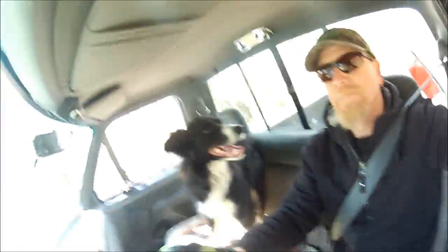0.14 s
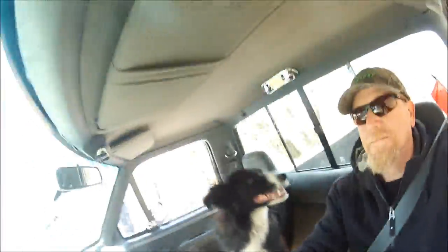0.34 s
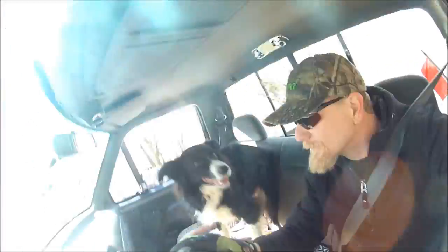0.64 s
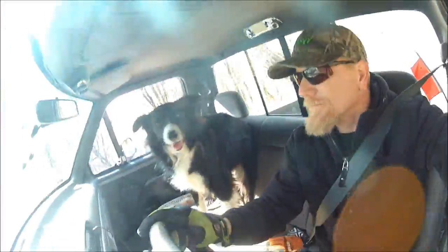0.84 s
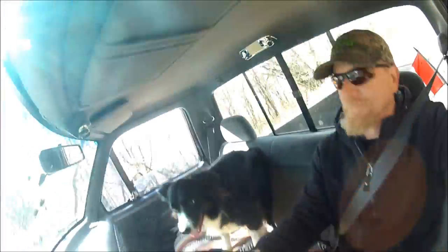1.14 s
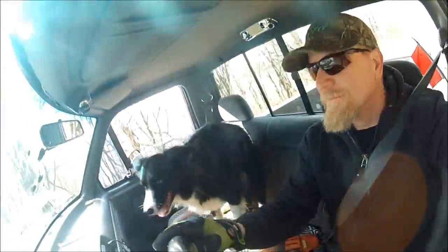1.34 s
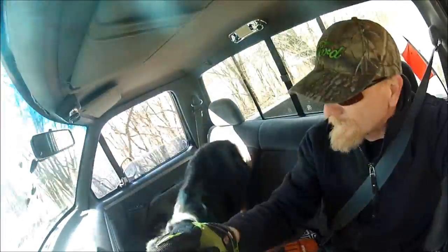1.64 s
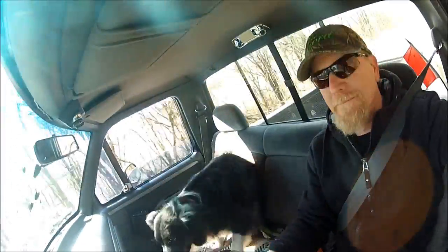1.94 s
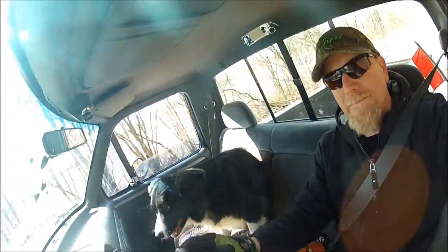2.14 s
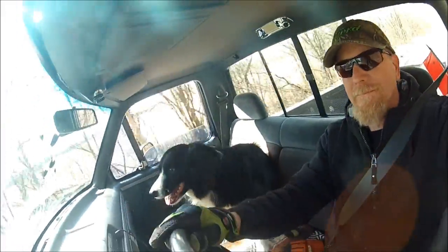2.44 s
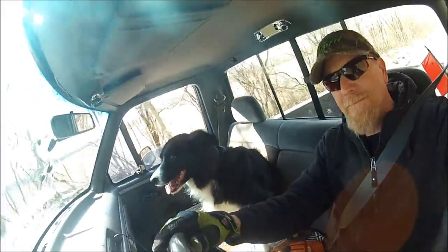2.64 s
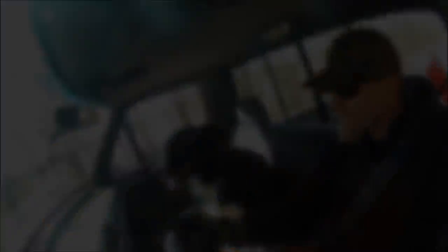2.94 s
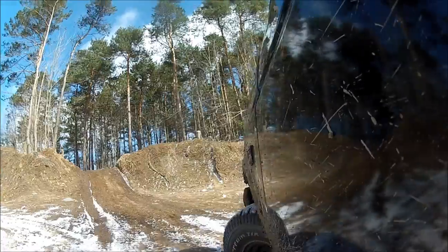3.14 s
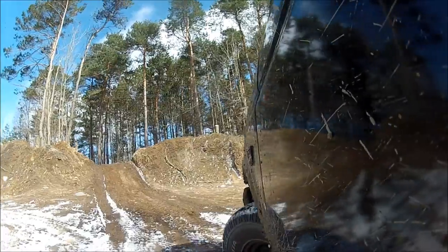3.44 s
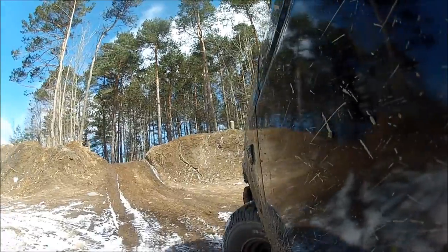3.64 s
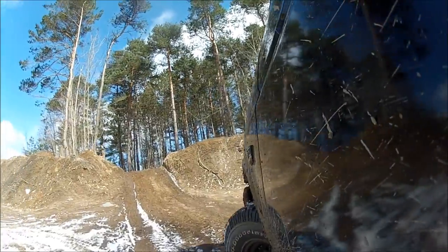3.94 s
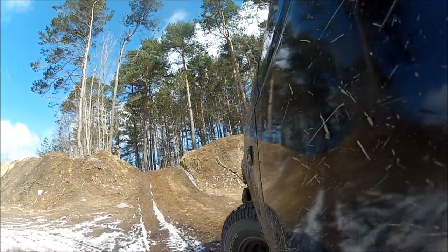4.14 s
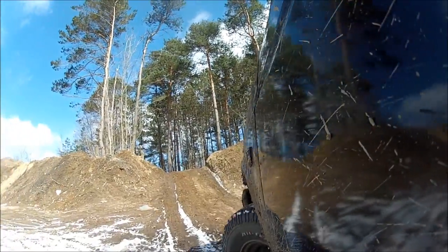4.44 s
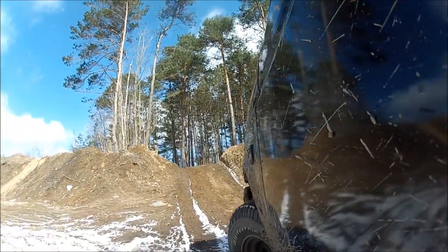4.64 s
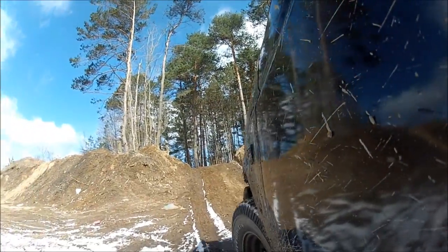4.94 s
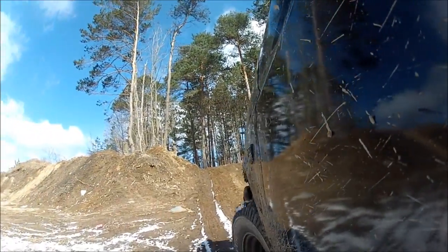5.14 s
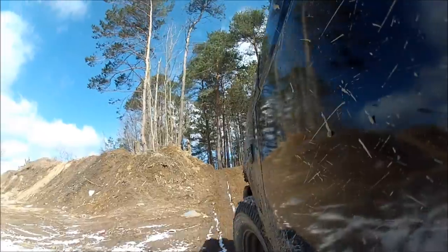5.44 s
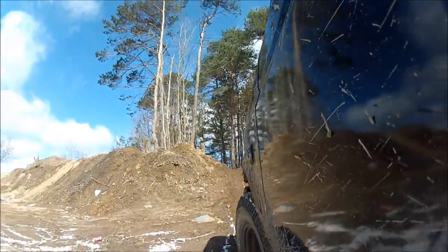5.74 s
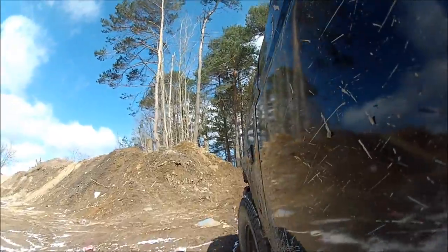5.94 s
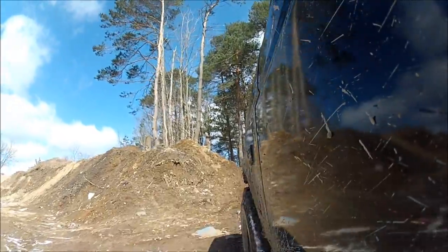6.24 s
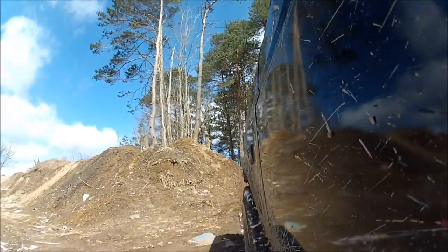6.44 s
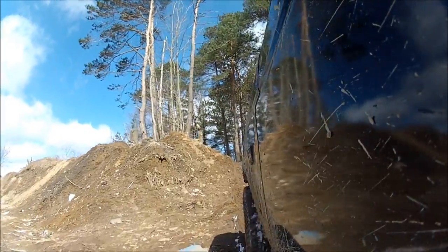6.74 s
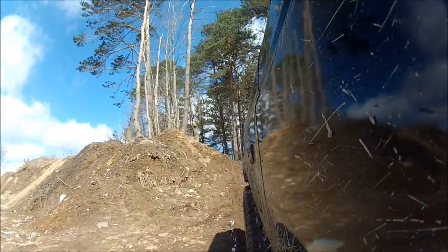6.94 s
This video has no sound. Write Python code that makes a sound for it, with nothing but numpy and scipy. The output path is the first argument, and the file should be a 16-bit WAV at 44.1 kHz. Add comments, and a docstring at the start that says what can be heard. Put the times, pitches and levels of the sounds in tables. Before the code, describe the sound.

Fingers rub, tick and knock a hard plastic camera case right on the microphone, the hardest blows distorting, while a V8 booms low and faint inside a truck cab. Around three seconds it shifts outside by the front wheel: last knocks, then steady exhaust burble, airy fan rush, belt whine, wind and gritty tyres, with small stone pops, brief metal scrapes and two engine revs.

```python
"""A hand rubs, ticks and knocks the plastic case of a small camera, close on the microphone: fingers stick
and slip, hard contacts ring the case, and the loudest knocks overload the microphone.
Behind it a V8 truck crawls along a dirt trail: in the cab, firing pulses boom and ruts rumble.
From 3 s the case rides outside by the front wheel: pulsed exhaust burble, fan rush, belt whine,
and noise for tyre grit and wind, with stones popping under the tread and short metal scrapes."""
import sys
import numpy as np
from scipy import signal
from scipy.fft import rfft, irfft, next_fast_len
from scipy.io import wavfile
from scipy.ndimage import map_coordinates

SR = 44100
rng = np.random.default_rng(int(sys.argv[2]) if len(sys.argv) > 2 else 0)


def wav_record(signal):
    """Record a signal, one row per channel, as 16-bit PCM in the file named by sys.argv[1]."""
    frames = np.transpose(np.atleast_2d(signal))
    bounded = np.clip(frames, -1, 1)
    # unit amplitude maps onto the largest positive 16-bit level
    quanta = np.round(bounded * 32767).astype(np.int16)
    wavfile.write(sys.argv[1], SR, quanta)


N = 313551
TIME = np.arange(N) / SR

# Levels of single contacts are dB against 10 ms at rms 1; widths are nominal, see resonate().
# Engine heard in the cab. Each row: time in seconds, mean firing rate in Hz, boom level in dB.
CAB_ENGINE = [(0, 61.74, -37), (.5, 62.4, -35.5), (.75, 66.05, -42.5), (1.1, 61.9, -42), (1.4, 49.6, -40),
              (1.8, 47.88, -45), (2.35, 47.5, -42.5), (2.52, 47.7, -50), (3.1, 47.2, -50)]
# Boom of the cab, as a spectrum. Each row: frequency in Hz, relative level in dB.
CAB_BOOM = [(15, -22.5), (28, 1.5), (45, 5.5), (65, -1.5), (95, -1.5), (120, 0), (150, -15.5), (260, -18),
            (500, -29.5), (1200, -74)]
# Air noise in the cab, as a spectrum. Each row: frequency in Hz, relative level in dB.
CAB_AIR = [(120, -49.5), (200, -10.5), (462, -15.5), (525, -10), (755, -2.5), (1840, -13.5), (1980, -10),
           (2510, -34.5), (4100, -29), (6130, -53.5), (10000, -30), (13900, -18.5), (15500, -52.5)]
# Engine heard outside; the driver lifts off at 4.5 s, then revs twice.
# Each row: time in seconds, mean firing rate in Hz, load level in dB.
DRIVE = [(3.25, 59.9, -43), (3.6, 60.14, -44), (3.9, 70.1, -41.5), (4.07, 70.86, -43), (4.2, 60.87, -45),
         (4.43, 60.3, -46), (4.58, 60.54, -53.5), (4.8, 64.9, -45), (5.0, 96.25, -45), (5.17, 113.2, -44.5),
         (5.35, 104.9, -46), (5.55, 81.83, -46), (5.88, 71.6, -46), (6.15, 66, -50), (6.5, 55.98, -47.5),
         (6.85, 73.77, -44.5), (7.0, 95.3, -45), (7.11, 97.2, -44.5)]
# Exhaust burble, as a spectrum. Each row: frequency in Hz, relative level in dB.
EXHAUST = [(25, -51), (48, -25), (65, -1), (105, -1.5), (121, 0), (145, -5.5), (175, -26), (202, -25),
           (223, -1.5), (248, -18.5), (280, -22), (325, -20), (400, -46), (900, -47.5)]
# Booms of the truck body and tyres. Each row: frequency in Hz, width in Hz, relative level in dB.
BODY_BOOMS = [(117.4, 9.7, -2.5), (221.4, 9.2, 0.5)]
# Wind, as a spectrum. Each row: frequency in Hz, relative level in dB.
WIND = [(15, -42), (30, 5), (70, 10), (130, 9), (190, -14), (400, -26), (1200, -69)]
# Resonances that colour the fan rush. Each row: frequency in Hz, width in Hz, relative level in dB.
FAN_RESONANCES = [(670, 170, -4), (1250, 260, -3), (1810, 220, 0), (2220, 440, 0), (3080, 380, -8),
                  (5530, 250, -20), (6450, 250, -22), (9000, 400, -18), (9950, 600, -13), (14100, 800, -19),
                  (15100, 280, -24)]
# Tyre grit, as a spectrum. Each row: frequency in Hz, relative level in dB.
TYRES = [(160, -5), (280, -5), (648, 4.5), (863, -1.5), (1230, 5.5), (1580, -4), (1780, 5), (2320, -22),
         (2660, -58), (3090, -6.5), (4330, -19), (9850, -23.5), (15500, -11.5)]
# Stones under the tyre. Each row: start in seconds, level in dB, pitch in Hz.
STONES = [(3.875, -46, 1300), (4.26, -48, 896), (4.39, -56, 3160), (4.579, -48.5, 982), (4.714, -45.5, 642)]
# Short scrapes at the wheel. Each row: start in seconds, length before release in seconds, peak in dB.
SCRAPES = [(4.713, 0.016, -39), (4.759, 0.019, -32), (4.785, 0.04, -35.5), (4.941, 0.029, -41)]
# Resonances of the scraping metal. Each row: frequency in Hz, width in Hz, relative level in dB.
METAL = [(1761, 69, 11.5), (2342, 150, 4.5), (2470, 80, -5.5), (2890, 220, -4), (3270, 260, -2.5),
         (3800, 640, -17.5), (5000, 750, -21.5), (9300, 1100, -10), (14400, 630, -14)]
# Finger strokes over the case. Each row: start in seconds, length in seconds, level in dB.
STROKES = [(0.054, 0.23, -39.5), (0.263, 0.25, -35), (0.457, 0.096, -20), (0.579, 0.28, -39),
           (0.916, 0.09, -33.5), (0.984, 0.33, -42), (1.152, 0.077, -35), (1.222, 0.17, -42),
           (1.402, 0.2, -38), (1.686, 0.093, -39.5), (1.798, 0.07, -49.5), (2.013, .08, -48.5),
           (2.169, 0.075, -36.5), (2.321, 0.089, -45), (2.404, 0.2, -46), (2.61, .17, -46.5),
           (2.77, 0.087, -49.5), (2.961, 0.32, -37.5)]
# Resonances of the case. Each row: frequency in Hz, width in Hz, relative level in dB.
CASE = [(730, 120, -16), (1230, 240, -10), (1480, 140, -8), (1900, 200, 0), (2200, 140, -9),
        (3550, 380, -17), (8450, 480, -24), (10100, 380, -15), (10600, 300, -27), (13950, 450, -18)]
# The note that rubbing draws from the case. Each row: frequency in Hz, width in Hz, relative level in dB.
CASE_NOTE = [(648.7, 22, 0)]
# A light touch on the case, as a spectrum. Each row: frequency in Hz, relative level in dB.
LIGHT_TOUCH = [(400, -21.5), (650, -2.5), (1050, -3.5), (1500, -5.5), (2200, -6), (2800, -23),
               (3600, -13.5), (4500, -23.5), (6000, -35.5), (8200, -22), (9200, -27), (10600, -18),
               (12000, -32), (14000, -27)]
# The crack of a sharp contact, as a spectrum. Each row: frequency in Hz, relative level in dB.
CRACK = [(1200, -14.5), (2600, -3), (3600, 8), (4800, -2.5), (6000, -23), (8400, 1.5), (9400, -31),
         (10300, -6), (12000, -3.5), (13800, -4.5), (15500, -32)]
# Loudest snaps of the plastic. Each row: time in seconds, tick level in dB, sharp edge in dB before its lift.
TICKS = [(0.0094, -26.5, -54), (0.0577, -32, -75), (0.1284, -27, -54), (0.3293, -25.5, -54.5),
         (0.3455, -30, -64.5), (0.3705, -21.5, -66.5), (0.42, -24, -38), (0.494, -15.5, -57),
         (0.5035, -11.5, -55), (0.9227, -23, -32), (0.9528, -24.5, -34), (1.2799, -30.5, -37),
         (1.3213, -23.5, -40), (1.5667, -35, -35.5), (1.8907, -41, -62), (2.0106, -41, -34),
         (2.212, -45, -35.5), (2.262, -46.5, -46), (2.67, -49, -39), (2.9954, -32, -70),
         (3.0425, -25, -40.5), (5.1449, -38.5, -49)]
# Blows on the case. Each row: start in seconds, strength in dB, clack pitch in Hz, thud in the mount in dB
# over the strength, squareness in dB (about 0 is flat on, -25 and below is glancing).
KNOCKS = [(0.145, -9, 943, -3, -16), (0.2059, -21.5, 1710, -4, -23), (0.313, -4.5, 1173, -4, -24.5),
          (0.5326, -11.5, 1700, 0, -29), (0.6675, -14, 1700, -7.5, -14.5), (0.721, -13, 944, -1, -50),
          (0.762, -14.5, 1463, -9.5, -22), (1.0695, -11.5, 1005, -1, -14), (1.2988, -11.5, 1612, 1.5, -2.5),
          (1.3886, -21.5, 1390, -6, -1.5), (1.408, -17.5, 1600, -22, -33), (1.4525, -21, 1494, -2, -2.5),
          (1.71, -19, 696, -6.5, -2.5), (1.8085, -16, 944, -11.5, -2), (2.025, -13.5, 873, -17, 1),
          (2.151, -16, 862, -13.5, 2), (2.3105, -11, 960, -24, -3), (2.4247, -21.5, 860, -12, -4),
          (3.1394, -17.5, 1697, -1, -21), (3.1628, -23.5, 1920, -16, -17)]
# What rings on after a blow. Each row: nominal frequency in Hz, mean relative level in dB, t60 in seconds.
RING = [(635, -1, .18), (690, 2, .06), (11360, -28, .22), (12630, -26, .22)]
# Soft bumps of the hand. Each row: start in seconds, level in dB.
BUMPS = [(0.422, -20.5), (1.083, -23), (1.428, -19), (1.773, -24), (2.39, -29), (3.211, -26.5)]
# Uneven treble of the microphone's port. Each row: frequency in Hz, gain in dB.
PORT = [(11000, 0), (11600, -9), (12400, -9), (13000, -1), (15100, -1), (15600, -18)]
# The outside fades in from the first to the second time, in seconds.
OUTSIDE_FADE_S = (2.95, 2.987)

IDLE_HZ = 60  # firing rate
RUSH_DB, RUSH_DB_PER_OCTAVE = -8, 8  # gain of the rush over the load at idle, and its growth with speed
STROKE_RISE, STROKE_FALL = 0.24, 0.34  # shares of a stroke spent pressing on and letting go
REST_DB, REST_DB_PER_S = -44, -7  # the resting grip creaks ever less
LET_GO_S = 3.26  # the resting hand leaves the case
SNAPS_PER_S, SNAP_DB = 30, -9  # stray snaps of the plastic, gain over the rubbing
RING_DB, RING_GROWS, RING_SQUARE = -16, .4, .15  # at 0 dB; dB per dB of strength and of squareness
GLANCING_DB, GLANCING_SHARPENS = -25, .03  # a blow this glancing raises the ring by this share
TOP_HZ = 15600  # band limit, 6 dB down


def amp(db):
    """Decibels to gain."""
    return 10 ** (np.asarray(db) / 20)


def unit(x):
    """Scale to rms 1."""
    return x / np.sqrt(np.mean(x ** 2) + 1e-20)


def blow(x):
    """Scale a short sound to the energy of 10 ms at rms 1."""
    return x / np.sqrt(np.sum(x ** 2) / (SR / 100) + 1e-20)


def noise():
    """White noise for the whole scene."""
    return rng.standard_normal(N)


def curves(rows):
    """One value per sample for each column after the time."""
    s, *cols = np.transpose(rows)
    return [np.interp(TIME, s, c) for c in cols]


def wobble(rate):
    """A smooth random curve, rate knots a second."""
    knots = rng.standard_normal(2048)
    coarse = TIME[::32]
    return np.interp(TIME, coarse, map_coordinates(knots, [coarse * rate], mode="wrap"))


def filtered(x, response):
    """x times a complex response of frequency."""
    m = next_fast_len(len(x) + 4096)
    return irfft(rfft(x, m) * response(np.fft.rfftfreq(m, 1 / SR)), m)[:len(x)]


def coloured(x, points):
    """x through a spectrum of (Hz, dB) points, flat beyond the ends."""
    f, db = np.transpose(points)
    return filtered(x, lambda hz: amp(np.interp(np.log(hz + 1), np.log(f), db)))


def resonate(x, modes):
    """x through a body's resonances, each 6 dB down across 1.26 widths; steep skirts keep the valleys dark."""
    def body(f):
        total = 0
        for k, (centre, width, db) in enumerate(modes):
            damping = 1j * f * 1.26 * width
            peak = damping / (centre ** 2 - f ** 2 + damping)
            total = total + amp(db) * peak ** 2 * (-1) ** k  # neighbours have opposite signs
        return total
    return filtered(x, body)


def standing_waves(x, share, t60):
    """Dense narrow resonances inside the case comb the treble, by a noise tail cut at 50 ms."""
    t = np.arange(SR // 20) / SR
    tail = coloured(rng.standard_normal(len(t)) * amp(-60 * t / t60), [(1500, -17), (5000, -4)])
    return x + share * signal.fftconvolve(x, tail / np.linalg.norm(tail))[:N]


def add(track, s, sound):
    """Mix a sound in at time s."""
    part = track[max(round(s * SR), 0):][:len(sound)]
    part += sound[:len(part)]


def grains(rate, spread_db):
    """Random impulses of uneven size, rate a second, rms 1."""
    hit = rng.random(N) < rate / SR
    return unit(hit * noise() * amp(spread_db * noise()))


def burst(t, rise):
    """A noisy contact that swells for `rise` seconds and dies."""
    return rng.standard_normal(len(t)) * t / rise * np.exp(-t / rise)


def snap(t, rise):
    """A sharp contact followed by a short gritty slide of equal energy."""
    slide = burst(t, rise)
    return (t == 0) + slide / np.linalg.norm(slide)


def mode(t, hz, t60, attack):
    """One damped vibration."""
    return np.sin(2 * np.pi * hz * t) * amp(-60 * t / t60) * (1 - np.exp(-t / attack))


def clack(t, hz, rise):
    """A few cycles that swell for `rise` seconds and die."""
    return blow(np.sin(2 * np.pi * hz * t) * (t / rise) ** 2 * np.exp(-2 * t / rise))


def firings(speed, uneven, rough):
    """One pulse per firing, and the firing phase; the two banks make the eight pulses unequal."""
    phase = np.cumsum(speed * (1 + .007 * wobble(12))) / SR
    at = np.flatnonzero(np.diff(np.floor(phase)))
    bank = np.array([1, -1, 1, 1, -1, 1, -1, -1])
    pulses = np.zeros(N)
    pulses[at] = 1 + uneven * bank[np.arange(len(at)) % len(bank)] + rough * noise()[:len(at)]
    return pulses - speed / SR, phase  # the mean is taken out


def cab():
    """The engine's firing pulses boom in the cab while the body rumbles over ruts, with faint air noise."""
    speed, boom_db = curves(CAB_ENGINE)
    pulses, _ = firings(speed, uneven=0.69, rough=.15)
    engine = unit(coloured(pulses, CAB_BOOM))
    ruts = unit(coloured(noise(), CAB_BOOM))
    air = amp(-63.0) * unit(coloured(noise(), CAB_AIR))
    return amp(boom_db) * (engine + ruts / 2 ** .5) + air


def engine_exhaust(pulses, phase):
    """Gas noise rides on the firing pulses; the body hums when a firing harmonic crosses one of its booms."""
    drive = unit(pulses) + .7 * noise()
    burble = amp(0.5) * unit(coloured(drive, EXHAUST))
    boom = amp(-15.5) * unit(resonate(drive, BODY_BOOMS))
    harmonics = sum(np.cos(2 * np.pi * k * phase) for k in (2, 3))
    hum = amp(-10) * unit(resonate(harmonics, BODY_BOOMS))
    return burble + boom + hum


def wind():
    """Low noise in gusts, dropping as the truck turns behind the bank."""
    wind_db = np.interp(TIME, [4.25, 4.9], [-2, -13]) + 2 * wobble(9)
    return amp(wind_db) * unit(coloured(noise(), WIND))


def front_rush(speed, phase):
    """Fan noise throbs at the firing rate over a belt whine of its harmonics and tyre grit of dense grains."""
    throb = 1 + 0.26 * np.cos(2 * np.pi * phase)
    fan = unit(resonate(noise() * throb, FAN_RESONANCES)) * amp(1.27 * wobble(41))
    harmonics = sum(np.sin(2 * np.pi * k * phase) for k in (12, 17, 21, 25, 29, 33))
    whine = unit(resonate(harmonics, FAN_RESONANCES))
    grit = unit(coloured(grains(rate=12000, spread_db=1), TYRES))
    rush = standing_waves(amp(-2.5) * fan + amp(-7.0) * whine + amp(-3.5) * grit, share=0.99, t60=0.054)
    return amp(RUSH_DB + RUSH_DB_PER_OCTAVE * np.log2(speed / IDLE_HZ)) * rush


def trail():
    """Outside by the front wheel: exhaust, wind and rush all follow the load level."""
    speed, load_db = curves(DRIVE)
    pulses, phase = firings(speed, uneven=0.59, rough=0.74)
    return amp(load_db) * (engine_exhaust(pulses, phase) + wind() + front_rush(speed, phase))


def stones():
    """Stones pop dully from under the tread: a noise burst through one broad resonance."""
    out, t = np.zeros(N), np.arange(SR // 20) / SR
    for s, db, hz in STONES:
        add(out, s, amp(db) * blow(resonate(burst(t, rise=0.005), [(hz, hz * 0.7, 0)])))
    return out


def scrapes():
    """Metal scuffs briefly by the wheel, grains ringing it; a far fainter scuff lies before and after."""
    attack, release = .002, .015  # seconds
    level = np.zeros(N)
    for s, length, db in SCRAPES:
        times = [s, s + attack, s + length, s + length + release]
        level += amp(db) * np.interp(TIME, times, [0.0052, 1, 0.5, 0.021])  # the end values hold
    return level * unit(resonate(grains(rate=12000, spread_db=0), METAL))


def pressure():
    """Each stroke presses on, holds and lets go, over the light resting grip."""
    level = amp(REST_DB + REST_DB_PER_S * TIME) * (TIME <= LET_GO_S)
    for s, length, db in STROKES:
        done = (TIME - s) / length
        ramps = np.minimum(done / STROKE_RISE, (1 - done) / STROKE_FALL)
        level = level + amp(db) * np.clip(ramps, 0, 1)
    return level


def slips():
    """Dense stick-slip grains of flickering level."""
    return grains(rate=3000, spread_db=2) * amp(3.2 * wobble(80))


def rubbing():
    """Fingers stick and slip on the case; the harder they press, the more its resonances speak."""
    level = pressure()
    press = np.clip((20 * np.log10(level + 1e-9) + 39) / 22, .1, .98)
    hard = unit(standing_waves(resonate(slips(), CASE), share=.5, t60=0.033))
    soft = unit(standing_waves(coloured(slips(), LIGHT_TOUCH), share=0.38, t60=0.3))
    note = unit(resonate(slips(), CASE_NOTE))
    catches = grains(rate=SNAPS_PER_S, spread_db=-2.5)
    snaps = unit(resonate(catches, CASE)) + amp(-7) * unit(coloured(catches, CRACK))
    touch = np.sqrt(press) * hard + np.sqrt(1 - press) * soft
    return level * (touch + amp(-13.5) * note + amp(SNAP_DB) * snaps)


def ticks():
    """Small slips snap the case's resonances, with a sharp edge."""
    out, t = np.zeros(N), np.arange(SR // 25) / SR
    for s, db, edge_db in TICKS:
        contact = snap(t, rise=0.0013)
        tick = amp(db) * blow(resonate(contact, CASE))
        edge = amp(edge_db + 1.5) * blow(coloured(contact, CRACK))
        add(out, s - .0005, tick + edge)  # starts just ahead of the listed time
    return out


def knock_body(t, clack_hz, hardness):
    """Hard, high contacts reach the upper resonances of the shell; soft ones flex its wall."""
    shell = amp(6) * hardness ** 3 * blow(resonate(snap(t, rise=0.0005), CASE))
    wall = amp(-7.5) / hardness * clack(t, hz=760.0, rise=0.0021)
    chatter = amp(-2.5) * hardness * blow(coloured(burst(t, rise=0.0024), LIGHT_TOUCH))
    return clack(t, clack_hz, rise=0.0012) + shell + wall + chatter


def after_ring(t, square_db):
    """A glancing blow loads the case less and rings a little higher; the changing grip shifts the weights."""
    grip = 1 + GLANCING_SHARPENS * square_db / GLANCING_DB + .004 * rng.standard_normal()
    ring = np.zeros(len(t))
    for hz, db, t60 in RING:
        ring += amp(db + 2 * rng.standard_normal()) * mode(t, hz * grip, t60, attack=.001)
    return ring


def mount_thud(t):
    """The blow pushes the mount, which hums on."""
    push = mode(t, hz=69.4, t60=0.022, attack=.0002) + 2.8 * mode(t, hz=168, t60=0.016, attack=0.00019)
    return blow(push + .2 * mode(t, hz=116.8, t60=0.22, attack=0.0011))


def knocks():
    """Each blow clacks at a pitch set by where it lands, thuds in the mount and leaves the case ringing."""
    out, t = np.zeros(N), np.arange(SR // 3) / SR
    for s, strength_db, clack_hz, thud_db, square_db in KNOCKS:
        hardness = clack_hz / 1700
        body = knock_body(t, clack_hz, hardness)
        thud = amp(thud_db) * mount_thud(t)
        # a square blow sounds hollower, cracks more and rings on more than a glancing one
        hollow = amp(square_db - 1.5) * clack(t, hz=365.5, rise=0.0015)
        crack = amp(square_db) * hardness * blow(coloured(burst(t, rise=0.0011), CRACK))
        ring_db = RING_DB + RING_GROWS * strength_db + RING_SQUARE * square_db
        ring = amp(ring_db) * after_ring(t, square_db)
        add(out, s, amp(strength_db) * (body + thud + hollow + crack) + ring)
    for s, db in BUMPS:
        add(out, s, amp(db) * blow(mode(t, hz=64, t60=0.042, attack=0.0031)))
    return out


def scene():
    """The cab gives way to the outside, overlapping briefly; the handling sounds on the case itself."""
    outside = np.interp(TIME, OUTSIDE_FADE_S, [0, 1])
    inside = np.interp(TIME, [3.15, 3.27], [1, 0])
    truck = inside * cab() + outside * trail() + scrapes() + stones()
    handling = rubbing() + ticks() + knocks()
    return (truck + handling)[None]


def record(dry):
    """The port colours the sound, the hardest knocks clip, and the band limit cuts steeply."""
    heard = coloured(dry[0], PORT)
    clipped = heard / (1 + np.abs(heard) ** 20) ** (1 / 20)
    return filtered(clipped, lambda hz: 1 / (1 + (hz / TOP_HZ) ** 120))[None]


dry = scene()
out = record(dry)
wav_record(out)
```